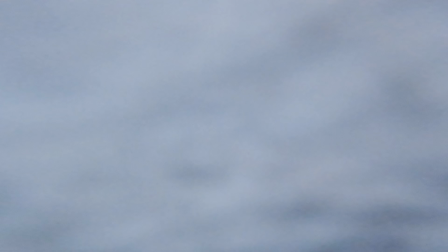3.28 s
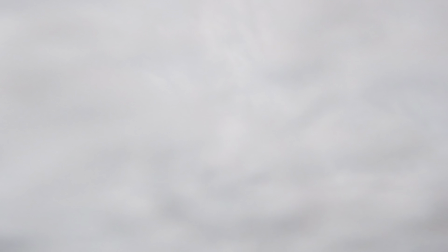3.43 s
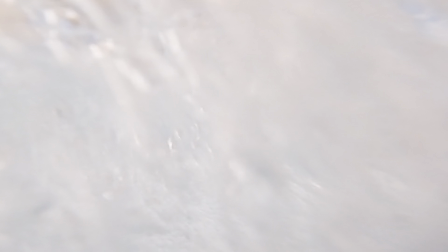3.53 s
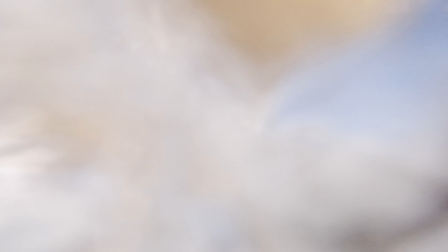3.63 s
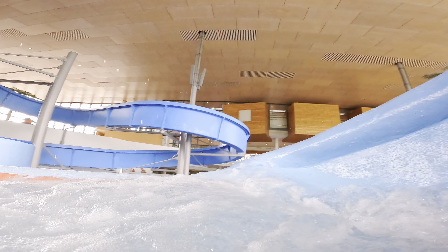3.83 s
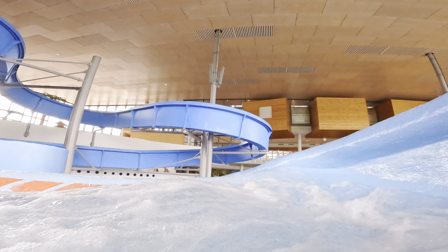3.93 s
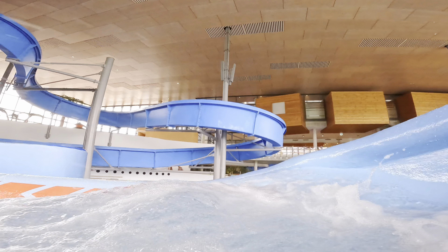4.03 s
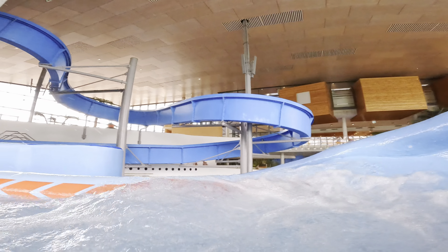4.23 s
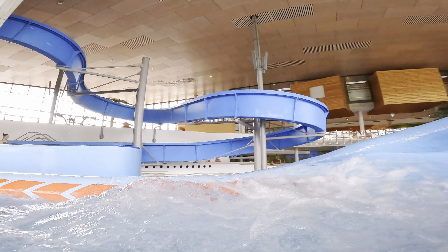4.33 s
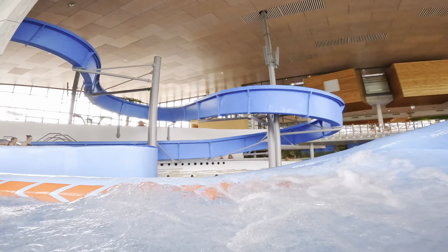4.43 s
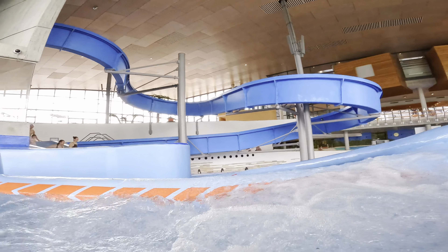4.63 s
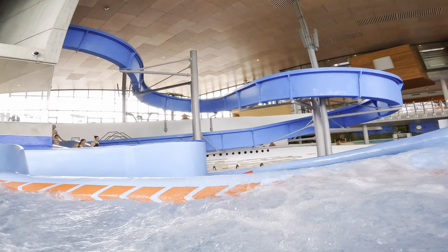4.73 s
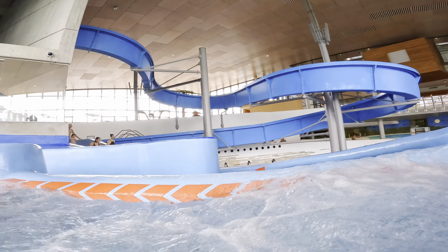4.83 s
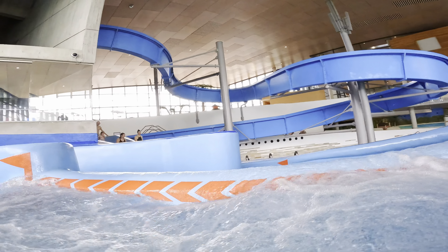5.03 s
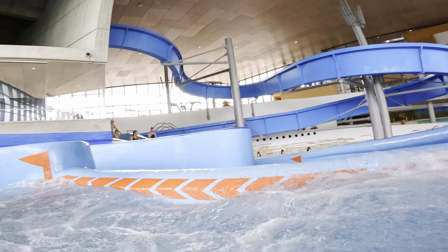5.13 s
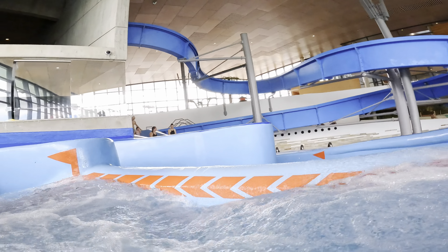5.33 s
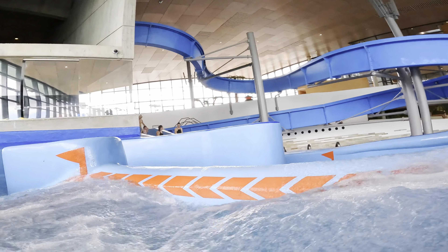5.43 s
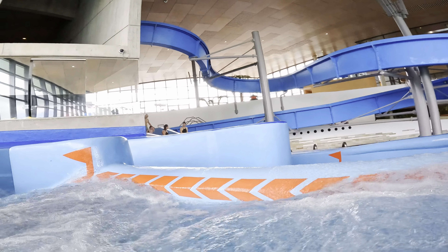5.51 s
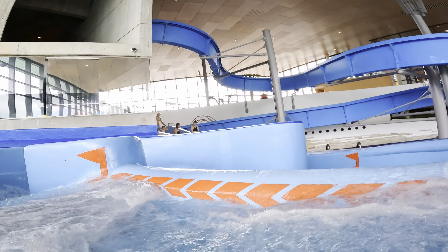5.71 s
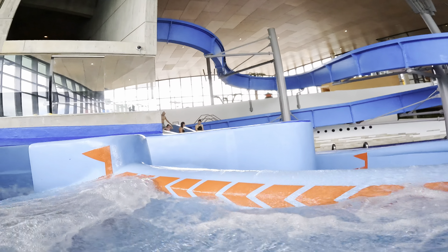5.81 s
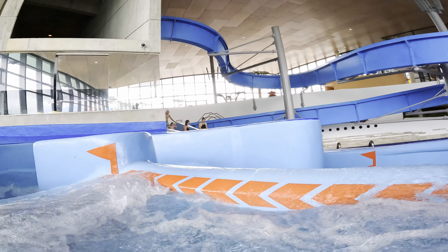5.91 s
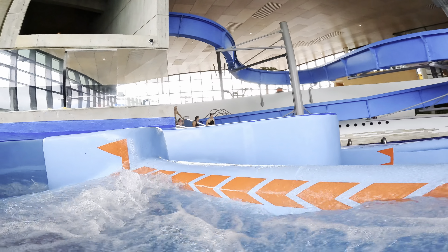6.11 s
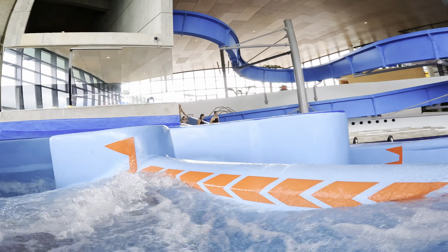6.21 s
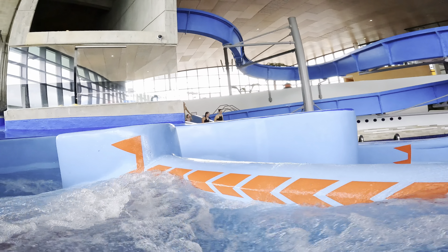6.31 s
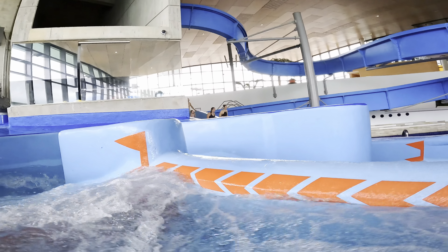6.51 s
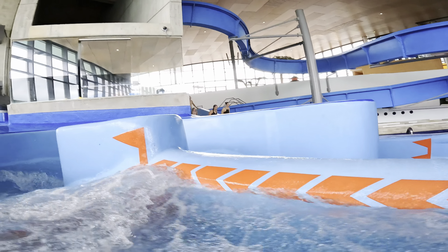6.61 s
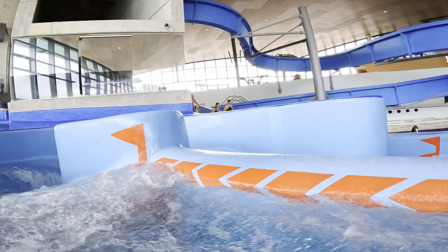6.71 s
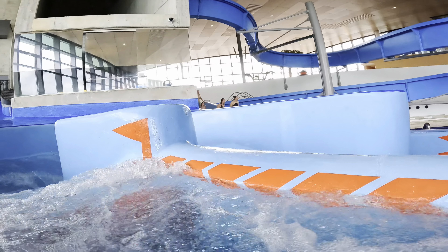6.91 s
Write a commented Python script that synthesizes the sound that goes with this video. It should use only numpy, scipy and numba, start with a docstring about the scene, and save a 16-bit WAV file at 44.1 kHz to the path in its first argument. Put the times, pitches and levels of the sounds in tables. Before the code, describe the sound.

Very close, muffled water: low glugs and fine fizzing bubbles, then a cluster of loud gulps at about one second. Quick gurgling spurts, slaps and bright plinks follow against the housing. The water lets go just before four seconds, leaving a thinner open-air rush that grows fuller and louder in the indoor slide channel, with light wind flutter on the microphone.

```python
"""A ride down a water slide

A waterproof camera rides the rapids of an indoor water slide. It starts submerged in fizzing flow, then churns
along the surface, where water glugs, slaps and bubbles on its housing. At 3.8 s it comes up into the air, and the
rush of the channel grows, heard through a ringing film of water on the ports. Swarms of short ringing tones make
the bubbles, shaped noise makes the rush and spray, and single tones and noise bursts make the closest splashes.
"""
import sys
import numpy as np
from scipy import signal
from scipy.fft import rfft, irfft, next_fast_len
from scipy.io import wavfile
from scipy.ndimage import uniform_filter1d, map_coordinates
from numba import njit

SR = 44100
rng = np.random.default_rng(int(sys.argv[2]) if len(sys.argv) > 2 else 0)


def waveform_to_disk(signal):
    """Save audio, clipped to [-1, 1], as 16-bit WAV at the path in sys.argv[1]."""
    frames = np.transpose(np.atleast_2d(signal))
    scaled = np.clip(frames, -1, 1) * 32767
    samples = np.round(scaled).astype(np.int16)
    wavfile.write(sys.argv[1], SR, samples)


N = 306936  # length in samples

# Loudness over time. Columns: t/s, level/dB
# large air pockets
CHURN_LEVEL = [(0.0, -22), (.3, -21), (.55, -23.5), (.68, -19), (.95, -27.5), (1.09, -18.5), (1.17, -24),
               (1.33, -23), (1.8, -24.5), (2.07, -26.5), (2.21, -18.5), (2.32, -20.5), (2.39, -24.5),
               (2.46, -21.5), (2.6, -21.5), (2.68, -20.5), (2.88, -19.5), (2.96, -24.5), (3.05, -19),
               (3.2, -24.5), (3.27, -19), (3.46, -21.5), (3.64, -21), (3.74, -24), (3.8, -34),
               (3.87, -28.5)]
# tiny bubbles heard under water
FIZZ_LEVEL = [(0.0, -28.5), (.33, -29.5), (.58, -23), (.66, -26.5), (.82, -28.5), (.86, -35.5), (.9, -32),
              (1.0, -29), (1.04, -37.5), (1.06, -72), (1.24, -56), (1.28, -35), (1.33, -59), (1.4, -110)]
# the hollow roar of the housing under water
ROAR_LEVEL = [(0, -27.5), (.4, -25.5), (.62, -25), (.82, -20.5), (.93, -24), (1.04, -21.5)]
# the channel heard in air, as its standing wave nears
RAPIDS_LEVEL = [(3.77, -41.5), (3.93, -36.5), (4.0, -38), (4.13, -31), (4.5, -29), (4.9, -25), (6.0, -21.5),
                (6.96, -19.5)]

# water breaking over the housing
# Columns: start t/s, length/s, bubble level/dB, small bubble level/dB, spray level/dB, bubble pitch f/Hz
WASHES = [(1.085, 0.021, -25, -50, -44.5, 917), (1.115, 0.031, -26.5, -49, -46.5, 907),
          (1.159, 0.071, -19, -29, -28, 1040), (1.299, 0.022, -28.5, -43, -35.5, 1063),
          (1.328, 0.067, -21, -35, -35.5, 1086), (1.403, 0.048, -23, -45, -33, 916),
          (1.457, 0.064, -21.5, -39.5, -32, 1120), (1.526, 0.046, -24.5, -38, -38.5, 1053),
          (1.592, 0.074, -22.5, -38, -31.5, 1263), (1.673, 0.04, -23.5, -37.5, -40.5, 982),
          (1.711, 0.075, -22, -33, -33, 1197), (1.817, 0.018, -25, -44.5, -29, 1254),
          (1.849, 0.034, -22, -40, -33, 1197), (1.889, 0.082, -22.5, -32, -34, 1198),
          (1.982, 0.094, -26.5, -40, -36.0, 1273), (2.708, 0.034, -24.5, -41, -41.5, 1205),
          (2.745, 0.064, -23, -39, -36.5, 1191), (2.818, 0.07, -22.5, -34.5, -35, 1130),
          (2.901, 0.072, -21.5, -38.5, -31.5, 1076), (2.978, 0.036, -23.5, -27.5, -37, 1134),
          (3.02, 0.021, -23, -39, -33, 1050), (3.048, 0.025, -22.5, -31, -30.5, 1220),
          (3.086, 0.016, -23.5, -34, -30.5, 1182), (3.144, 0.013, -23, -38, -35, 970),
          (3.176, 0.022, -24.5, -33, -37.5, 1200), (3.214, 0.026, -24.5, -38, -35.5, 1290),
          (3.268, 0.021, -28.5, -38, -36.5, 1370), (3.305, 0.048, -23, -35, -36.5, 1092),
          (3.364, 0.052, -24, -43, -39, 1186), (3.422, 0.076, -23.5, -41, -34, 1253),
          (3.528, 0.055, -23, -43, -36, 1113), (3.606, 0.034, -23, -39.5, -31.5, 1090),
          (3.652, 0.015, -23.5, -34, -35.5, 1115), (3.714, 0.029, -27.5, -50.5, -52, 1134),
          (3.748, 0.023, -26, -51.0, -55, 942)]
# the draining film of water. Columns: t/s, first mode f/Hz, second mode f/Hz, second mode level/dB
FILM_MODES = [(3.85, 1280, 2990, 12), (4.07, 1252, 2820, 15.5), (4.33, 1210, 2960, 14.5),
              (4.53, 1276, 3130, 20), (4.74, 1262, 3180, 15.5), (5.16, 1278, 3210, 20.5),
              (5.37, 1302, 3330, 16.5), (6.96, 1344, 3380, 19)]
# single bubbles pinching off close by; t60 is the time to fall by 60 dB
# Columns: t/s, level/dB, starting pitch f/Hz, t60/s, pitch gained as a share (below 0: lost)
PLINKS = [(1.2513, -28, 2680, .03, .15), (1.4595, -19.5, 1950, 0.016, -0.051), (1.469, -22, 2890, .03, .15),
          (1.478, -19, 2020, .022, 0.068), (1.5024, -14, 1760, .022, 0.099),
          (1.552, -13.5, 2150, 0.02, 0.07), (1.6527, -16.5, 1840, 0.031, 0.18),
          (1.714, -11, 1890, 0.02, -0.32), (1.767, -18, 2150, 0.017, .15), (1.8046, -24, 2230, 0.026, 0.41),
          (1.891, -18.5, 1810, 0.026, 0.21), (1.9278, -15.5, 1930, .022, .1),
          (1.941, -26, 1810, 0.027, -0.057), (1.9979, -14, 2300, 0.018, 0.2),
          (2.016, -20, 2720, 0.017, 0.35), (2.057, -14, 2550, 0.022, 0.37),
          (2.2358, -22.5, 2200, .015, 0.16), (2.2837, -14.5, 2350, 0.036, .02),
          (2.297, -27, 2050, 0.016, 0.27), (2.316, -36.5, 3500, .02, .05), (2.349, -30.5, 3830, .02, -0.11),
          (2.356, -17, 1950, .012, .1), (2.3599, -13, 2410, 0.016, 0.12),
          (2.417, -12.5, 2520, 0.0082, 0.47), (2.44, -26.5, 3170, .012, 0.11),
          (2.474, -35, 3550, .018, -0.023), (2.505, -37.5, 4400, 0.013, .05), (2.5204, -27, 2370, .02, .1),
          (2.566, -30.5, 1820, 0.02, .12), (2.604, -32, 3380, 0.023, .05),
          (2.7363, -23.5, 2330, 0.038, .05), (3.8278, -26, 3200, 0.022, -0.089),
          (4.206, -30.5, 2900, 0.019, 0.1), (5.481, -41, 2950, .012, -0.023)]
# sheets and drops of water slapping the housing. Columns: t/s, level/dB, ring f/Hz, t60/s
SLAPS = [(1.161, -28, 1025, 0.053), (1.203, -20.5, 1060, 0.066), (1.301, -26, 840, 0.022),
         (1.594, -17, 1196, 0.016), (1.82, -20, 1470, 0.037), (1.851, -25, 1290, 0.025),
         (2.1417, -24, 1325, 0.047), (2.296, -19.5, 1300, 0.021), (2.3396, -30, 1320, .025),
         (2.395, -17, 1300, 0.029), (2.4827, -21.5, 1450, 0.03), (2.532, -17, 1430, 0.02),
         (2.5637, -17.5, 1460, 0.019), (2.605, -34, 1340, 0.017), (2.71, -19.5, 1420, .025),
         (2.748, -22, 1380, 0.051), (2.902, -23, 1300, 0.019), (3.146, -20.5, 996, 0.043),
         (3.178, -23, 895, 0.019), (3.19, -20, 1420, 0.019), (3.2692, -23.5, 1446, .035),
         (3.606, -21.5, 1125, 0.047), (3.661, -24, 1060, 0.042), (3.76, -22, 877, 0.06),
         (3.827, -28, 1360, 0.017), (3.872, -27.5, 1264, 0.032), (4.137, -21, 1210, 0.019),
         (4.2062, -23.5, 1290, 0.04)]
# big gulps of air. Columns: t/s, level/dB, pitch f/Hz, t60/s
GULPS = [(0.205, -14, 432, 0.045), (.592, -9.5, 440, 0.032), (0.632, -4.5, 285, 0.045),
         (.755, -11.5, 414, 0.023), (.841, -8.5, 358, 0.037), (1.023, -5.5, 440, 0.021),
         (1.039, 1, 390, 0.034), (1.063, -4, 430, 0.043), (1.093, -2, 450, 0.041),
         (1.109, -11.5, 684, 0.043), (1.132, -3, 412, .042), (1.262, -12, 601, 0.035), (1.3, -8, 266, .04),
         (2.61, 2, 313, 0.018), (3.119, -10, 503, 0.063)]
# soft thuds as the water lets go of the housing. Columns: t/s, level/dB, swell time/s
THUDS = [(3.841, -16.5, .007), (3.9678, -14, .004), (4.212, -22, 0.0054)]
# big eddies of water or air that lean on the ports, or lulls between them
# Columns: middle t/s, half length/s, extra level/dB
SURGES = [(.15, 0.17, -2.5), (0.67, .07, -8.5), (0.825, 0.055, 1), (1.081, 0.047, 5), (1.326, 0.07, 7.5),
          (1.81, .05, -4.5), (1.92, 0.056, 6), (2.397, 0.019, 3.5), (3.446, 0.016, 7), (3.781, .025, -4),
          (4.158, .09, 6), (4.428, 0.04, 8.5), (5.4, 0.056, 6)]

# Tone colour: how strong each frequency is. Columns: f/Hz, level/dB
# eddies pushing on the ports, in water or air
BUFFET_COLOUR = [(6, -14.5), (18, 4), (35, 3), (70, -1), (115, -4), (200, -16.5), (500, -56), (1200, -105),
                 (4000, -150)]
# large air pockets and the dull roar under them
CHURN_COLOUR = [(70, -17), (130, 0.5), (200, -3), (320, -6), (480, -3.5), (620, -13.5), (900, -19.5),
                (1800, -44), (4000, -82), (8000, -140)]
# the hollow housing under water
ROAR_COLOUR = [(120, -34), (250, -9.5), (330, -2.5), (480, -1), (560, -13.5), (700, -28), (1500, -78.5)]
# clouds of tiny bubbles
FIZZ_COLOUR = [(400, -18), (700, 2), (1300, -3.5), (2000, -9.5), (2800, -10.5), (3350, -5), (3520, -23.5),
               (4200, -15), (4500, -24.5), (6100, -23.5), (6500, -28), (8000, -30), (12000, -41.5),
               (15500, -61)]
# water drops and spit
SPRAY_COLOUR = [(600, -1.5), (1300, -4), (2000, -9.5), (2800, -7.5), (4000, -14.5), (5500, -26),
                (7500, -35.5), (10000, -57.5), (15000, -88.5)]
# the rush of the channel
RAPIDS_COLOUR = [(50, -2.5), (100, -5), (155, 9), (200, 4.5), (290, -1), (400, -1), (510, 3), (680, -3.5),
                 (1100, -4.5), (1700, -14.5), (1990, -12), (2070, -15), (2170, -29.5), (2300, -20.5),
                 (2500, -38), (2690, -48), (2850, -35.5), (3020, -43), (3300, -37.5), (4000, -41.5),
                 (4300, -40), (5000, -42), (6200, -55.5), (12000, -81)]

# modes of the trapped air pocket. Columns: f/Hz, width/Hz, level/dB
POCKET_MODES = [(1300, 190, 28.5), (2500, 180, 13.5), (3400, 500, -26)]
# how far the left port leads the right. Columns: f/Hz, phase/rad
PORT_LEAD = [(200, 0), (400, .9), (500, 1.8), (590, 3.5), (750, 4.4), (1000, 4.68), (1500, 4.71)]
# the left port against the right, in water. Columns: f/Hz, level/dB
PORTS_AWASH = [(60, -2), (150, -2.5), (250, -5), (400, -5.5), (580, -14), (920, -3), (1400, 0), (2300, 3),
               (3500, 6), (4500, 16), (6000, 41)]
# the left port against the right, in air. Columns: f/Hz, level/dB
PORTS_IN_AIR = [(60, 11), (150, -1), (300, 1.5), (400, 1), (580, -16), (920, -3.5), (1400, 1), (2300, 3),
                (3500, 6.5), (6000, 32)]

TOP_HZ = 15600  # nothing is kept above this
DIVE_END_S, SURFACE_S = 1.044, 3.85  # the camera leaves the depths; it clears the water
BUFFET_DB, BUFFET_SWAY_DB = -20.5, 2.7  # steady push of the flow on the housing, and its random sway
WIND_DB, WIND_FOLLOWS = -27, 0.59  # air on the ports beside the standing wave; dB lost per dB of quieter rush
FIZZ_BODY_DB = -28.5  # the low part of the fizz, whose level is held under water
WASH_ATTACK_S, WASH_T60_S = 0.0022, 0.042  # each wash strikes at once, holds, then runs off
WASH_RISE = 0.11  # pitch gained from start to end of a wash, as a share of its middle pitch
WASH_RING, WASH_DAMPING = 0.75, 0.096  # ring of the folded air against the bubbles; its width over its pitch
FROTH_DB, MIST_DB = -37, -48.5  # bubbles left between the washes; small bubbles and spray left there
TRAPPED_S = (2.08, 2.71)  # air sits at the ports: (from s, to s)
GURGLE_DB, SPIT_DB = -29, -51  # its bursting bubbles; its small plinks and spit, both halfway through
GURGLE_EBB_DB, SPIT_EBB_DB = 6.5, 22  # how much weaker both are as the pocket forms and as it leaves
SNAP_DB, SNAP_S = -27, .0007  # the click of a bubble's neck closing: against its ring, and its life
TWIN_DB, TWIN_RATIO, TWIN_LAG_S = -12, 1.327, 0.0025  # a smaller twin bubble: strength, base pitch ratio, delay
CRACK_DB, CRACK_S = -6, 0.0011  # the first contact of a slap: its strength and its life
THUD_HZ, THUD_FALL, THUD_SLOSH = 580, 1.25, .35  # starting pitch; sinking time in swells; noise against tone
FILM_WIDTH_HZ, FILM_FRESH_HZ = 83, 4.9  # second mode's width at the loudest rush; added per dB of quieter rush
FILM_FLUTTER_DB = 2.2  # the second mode flutters in strength


def amp(db):
    """Turn decibels into a gain."""
    return 10 ** (np.asarray(db) / 20)


def unit(x):
    """Scale to an average (rms) strength of 1."""
    return x / np.sqrt(np.mean(x ** 2) + 1e-20)


def along(points, hz):
    """Read a curve of (f/Hz, value) points along a log frequency axis."""
    f, v = np.transpose(points)
    return np.interp(np.log(hz + 1), np.log(f + 1), v)


def curves(rows):
    """Draw one curve, with a value per sample, for each column after the time."""
    s, *cols = np.transpose(rows)
    return [np.interp(np.arange(N) / SR, s, c) for c in cols]


def during(start, end, fade=0.012):
    """Give 1 from start to end, fading to 0 outside."""
    t = np.arange(N) / SR
    return np.clip(1 + np.minimum(t - start, end - t) / fade, 0, 1)


def wobble(rate):
    """Draw a smooth random curve with this many random points a second."""
    return map_coordinates(rng.standard_normal(int(N * rate / SR) + 4), [np.arange(N) * rate / SR])


def steady(x, span=0.068):
    """Even out the strength over each span (s), so that only the fast texture is left."""
    power = uniform_filter1d(uniform_filter1d(x ** 2, int(span * SR), axis=-1), size=200, axis=-1)
    return x / np.sqrt(np.abs(power) + 1e-12)


def filtered(x, response):
    """Multiply each frequency of x by a response, which may also shift its phase."""
    m = next_fast_len(N + SR // 2)
    return irfft(rfft(x, m) * response(np.fft.rfftfreq(m, 1 / SR)), m)[..., :N]


def lowpass(x, cutoff_hz, order):
    """Weaken what lies above the cutoff, without shifting its phase."""
    return filtered(x, lambda hz: 1 / (1 + (hz / cutoff_hz) ** order))


def coloured(x, spectrum):
    """Give x a tone colour, at rms 1."""
    return unit(filtered(x, lambda hz: amp(along(spectrum, hz))))


def band_burst(order, low_hz, high_hz, length):
    """Make noise between two frequencies, at rms 1."""
    band = signal.butter(order, [low_hz, high_hz], "band", fs=SR)
    return unit(signal.lfilter(*band, rng.standard_normal(length)))


def pair(source, apart):
    """Make two channels that share a source, each with a part (0-1) of its own."""
    apart = np.clip(apart, 0, 1)
    return np.sqrt(1 - apart) * source() + np.sqrt(apart) * np.array([source(), source()])


def add(track, s, sound):
    """Mix a sound into a track at time s."""
    part = track[max(round(s * SR), 0):][:len(sound)]
    part += sound[:len(part)]


def crackle(rate, spread_db, hiss):
    """Mix white noise with random clicks of uneven size, rate clicks a second."""
    noise = rng.standard_normal(N)
    at, size, sign = rng.random((int(rate * N / SR), 3)).T
    heights = np.sign(sign - .5) * amp(spread_db * size)
    clicks = np.bincount((at * N).astype(int), heights, N)
    return unit(unit(clicks) + hiss * noise)


def spurts(rate, life, spread_db, base):
    """Make a gain that jumps at random moments and dies away over its life (s)."""
    at, size = rng.random((int(rate * N / SR), 2)).T
    jumps = np.bincount((at * N).astype(int), amp(spread_db * size), N)
    return base + unit(signal.lfilter([1], [1, -np.exp(-1 / (life * SR))], jumps))


def bubbles(rate, pitch_hz, scatter, cycles, rise, spread_db, size=1200):
    """Make a swarm of bubbles: each swells, rings a few cycles and rises in pitch."""
    at, strength, phase, a, b = rng.random((int(rate * N / SR), 5)).T[:, :, None]
    start = (at * N).astype(int)
    hz = np.broadcast_to(pitch_hz, N)[start] * np.exp(scatter * (a - b))
    k = np.arange(size)
    turns = hz * k / SR
    age = turns / cycles
    swell = (1 - np.exp(-2 * turns)) * np.exp(-age) * (1 - k / size)
    rising_turns = turns * (1 + rise * age / (1 + age))
    ring = amp(spread_db * strength) * swell * np.sin(2 * np.pi * (phase + rising_turns))
    return unit(np.bincount((start + k).ravel(), ring.ravel(), N + size)[:N])


def small_bubbles(pitch_hz):
    """Make clear, rising plinks: small bubbles ring high."""
    swarm = bubbles(rate=290, pitch_hz=pitch_hz, scatter=.52, cycles=14.0, rise=0.12, spread_db=14, size=1100)
    return lowpass(swarm, 4200, order=6)


@njit
def resonate(x, step, damping):
    """Ring like a hollow whose pitch (radians a sample) and width over pitch can move."""
    out = np.zeros(len(x))
    low = band = 0.0
    for i in range(len(x)):
        low += step[i] * band
        band += step[i] * (x[i] - low - damping[i] * band)
        out[i] = damping[i] * band
    return out


def surge_db():
    """Each big eddy swells and passes as a smooth bump in level; a lull is a dip."""
    t = np.arange(N) / SR
    return sum(db * np.exp(-((t - s) / half) ** 2) for s, half, db in SURGES)


def buffet():
    """Eddies push on the housing as deep noise, a little differently at each port."""
    level_db = BUFFET_DB + surge_db() + BUFFET_SWAY_DB * wobble(6.5)
    eddies = pair(lambda: coloured(rng.standard_normal(N), BUFFET_COLOUR), apart=0.21)
    return amp(level_db) * during(0, SURFACE_S, fade=0.018) * steady(eddies, span=0.24)


def churn():
    """Large air pockets glug at low pitches over a dull roar of noise."""
    level_db, = curves(CHURN_LEVEL)

    def glugs():
        """Pockets ring low in the noise of the flow."""
        pockets = bubbles(rate=130, pitch_hz=292.0, scatter=0.96, cycles=11.0, rise=0.22, spread_db=5.0, size=2200)
        dull_roar = coloured(rng.standard_normal(N), CHURN_COLOUR)
        return coloured(pockets, CHURN_COLOUR) + 1.34 * dull_roar

    level = amp(level_db + 1.7 * wobble(27.8)) * during(0, SURFACE_S)
    return level * steady(pair(glugs, apart=0.26), span=.06)


def roar():
    """The submerged housing booms in the flow, in irregular surges."""
    level_db, = curves(ROAR_LEVEL)
    boom = pair(lambda: coloured(rng.standard_normal(N), ROAR_COLOUR), apart=0.11)
    return amp(level_db + 0.71 * wobble(22)) * during(0, DIVE_END_S, fade=.04) * steady(boom)


def fizz():
    """Under water, clouds of tiny bubbles hiss and tick, and thin out as the camera rises."""
    level_db, = curves(FIZZ_LEVEL)
    ticks = bubbles(rate=500, pitch_hz=2108, scatter=0.94, cycles=26, rise=0.08, spread_db=36.0, size=700)
    cloud = coloured(crackle(rate=2900, spread_db=21.5, hiss=1.2) + 0.17 * ticks, FIZZ_COLOUR)
    body = lowpass(cloud, 1300, order=4)
    low_part = amp(FIZZ_BODY_DB) * during(0, DIVE_END_S, fade=0.015) * body
    high_part = amp(level_db) * (cloud - body)
    return amp(1.6 * wobble(30)) * (low_part + high_part)


def dulled(x):
    """The wet ports soften the highest part of the closest single sounds."""
    return lowpass(x, 6500, order=6)


def gulps():
    """A big gulp of air rings low as water thumps shut behind it."""
    out, t = np.zeros(N), np.arange(SR // 6) / SR
    for s, db, hz, t60 in GULPS:
        ring = amp(-60 * t / t60) * (1 - np.exp(-t / 0.0015)) ** 2 * np.sin(2 * np.pi * hz * t)
        u = t / 0.0013
        push = u * (1 - u / 2) * np.exp(-u) * (1 - np.exp(-2 * u)) ** 2  # the thump of the water
        add(out, s, amp(db) * (ring + 1.6 * push))
    return dulled(out)


def wash_motion():
    """Each wash strikes, holds and runs off while its bubbles shrink and so rise in pitch."""
    t = np.arange(N) / SR
    awash = during(DIVE_END_S, WASHES[-1][0] + WASHES[-1][1]) * (1 - during(*TRAPPED_S))
    gains = amp([[FROTH_DB], [MIST_DB], [MIST_DB]]) * awash  # rows: bubbles, small bubbles, spray
    pitch_hz = np.full(N, float(WASHES[0][5]))
    for s, length, bubbles_db, small_db, spray_db, hz in WASHES:
        near = slice(int(s * SR), int((s + length + WASH_T60_S) * SR))
        age = t[near] - s
        run_off = amp(-60 * np.maximum(age - length, 0) / WASH_T60_S)
        shape = np.clip(age / WASH_ATTACK_S, 0, 1) * run_off
        levels = amp([[bubbles_db], [small_db], [spray_db]])
        gains[:, near] = np.maximum(gains[:, near], levels * shape)
        pitch_hz[near.start:] = hz
        pitch_hz[near] = hz * (1 + WASH_RISE * (np.clip(age / length, 0, 1) - .5))
    return gains, pitch_hz


def washes():
    """Water breaks over the housing in spurts of bubbles, plinks and spray; thin froth lingers between."""
    gains, pitch_hz = wash_motion()
    pulse = spurts(rate=95, life=0.006, spread_db=12, base=0.45)
    swarm = bubbles(rate=600, pitch_hz=pitch_hz, scatter=0.45, cycles=11.1, rise=0.12, spread_db=12.5, size=1400)
    swarm = lowpass(swarm * np.sqrt(pulse), 2600, order=4)
    impacts = pulse * crackle(rate=1800, spread_db=20.5, hiss=0.88)
    # air folded under the wash rings with each spurt
    step = 2 * np.pi * pitch_hz / SR
    ring = resonate(coloured(impacts, SPRAY_COLOUR), step, np.full(N, WASH_DAMPING))
    swarm = unit(swarm) + WASH_RING * unit(ring)
    spray = coloured(impacts + 0.32 * pulse * rng.standard_normal((2, N)), SPRAY_COLOUR)
    plinking = small_bubbles(pitch_hz=1989)
    out = gains[0] * steady(swarm, span=0.016)
    out = out + gains[1] * steady(plinking, span=0.12)
    return out + gains[2] * steady(spray, span=0.014)


def slaps():
    """Water slaps the housing: a crack on contact, then a noisy sheet and a rising ring of folded-in air."""
    out, t = np.zeros(N), np.arange(SR // 6) / SR
    for s, db, hz, t60 in SLAPS:
        sheet = band_burst(3, 0.62 * hz, 1.1 * hz, len(t))
        cavity = np.sin(2 * np.pi * hz * t * (1 + 0.98 * t))  # the air that the slap folds in
        crack = amp(CRACK_DB) * np.exp(-t / CRACK_S) * band_burst(4, 900, 2100, len(t))
        ring = amp(-60 * t / t60) * (1 - np.exp(-t / 0.00085)) * (sheet + 2.47 * cavity)
        add(out, s, amp(db) * (ring + crack))
    return dulled(out)


def plinks():
    """A bubble pinches off with a click and a gliding ring, and sheds a smaller twin."""
    out, t = np.zeros(N), np.arange(SR // 6) / SR
    for s, db, hz, t60, rise in PLINKS:
        turns = np.cumsum(hz * (1 + rise * (1 - np.exp(-3 * t / t60)))) / SR
        decay = amp(-60 * t / t60)
        ring = decay * (1 - np.exp(-t / 0.00039)) * np.sin(2 * np.pi * turns)
        snap = amp(SNAP_DB) * np.exp(-t / SNAP_S) * rng.standard_normal(len(t))
        add(out, s, amp(db) * (ring + snap))
        ratio = TWIN_RATIO ** rng.uniform(0.6, 1.5)  # each twin has its own size
        twin = decay ** 2 * (1 - np.exp(-turns)) * np.sin(2 * np.pi * turns * ratio)
        add(out, s + TWIN_LAG_S, amp(db + TWIN_DB) * twin)
    return dulled(out)


def pocket_response(f):
    """Trapped air rings at its modes and blocks the band between the first two."""
    modes = 0
    for k, (centre, width, db) in enumerate(POCKET_MODES):
        mode = 1j * f * width / (centre * centre - f * f + 1j * f * width)
        modes = modes + (-1) ** k * amp(db) * mode
    hollow = 1 - 0.7 * np.exp(-((f - 2150) / 270) ** 2)
    return modes * hollow / (1 + (f / 3600) ** 8)


def trapped_air():
    """A pocket of air covers the ports; bursting bubbles ring its modes, small ones plink and spit."""
    pulse = spurts(rate=71, life=0.0079, spread_db=12, base=0.21)
    bursts = crackle(rate=850, spread_db=17, hiss=0.68) * pulse
    gurgle = unit(filtered(bursts, pocket_response))
    blips = bubbles(rate=120, pitch_hz=1373, scatter=0.13, cycles=16.0, rise=0.071, spread_db=12.0, size=1600)
    blips = lowpass(blips, 3000, order=4)

    def spit_response(f):
        """Spray with its low part thinned out."""
        return amp(along(SPRAY_COLOUR, f)) * f ** 4 / (f ** 4 + 2600 ** 4)

    spit = unit(filtered(unit(bursts * pulse) + 0.53 * rng.standard_normal(N), spit_response))
    small = steady(small_bubbles(pitch_hz=2660) + 0.8 * spit, span=0.057)
    ebb = np.interp(np.arange(N) / SR, TRAPPED_S, [-1, 1]) ** 2  # 1 at both ends, 0 halfway
    gurgle = amp(GURGLE_DB - GURGLE_EBB_DB * ebb) * steady(gurgle + 0.51 * blips, span=0.03)
    small = amp(SPIT_DB - SPIT_EBB_DB * ebb) * small
    return during(*TRAPPED_S) * (gurgle + small)


def rapids():
    """The channel's rush passes a draining film of water, which rings at two wandering, rising modes."""
    level_db, = curves(RAPIDS_LEVEL)
    first_hz, second_hz, second_db = curves(FILM_MODES)
    far_db = level_db.max() - level_db  # how far the rush is below its loudest
    rush = coloured(crackle(rate=900, spread_db=23.0, hiss=1.55), RAPIDS_COLOUR)
    bass = lowpass(rush, 380, order=4)
    rush = rush - bass + bass * amp(-.21 * far_db)  # the nearer the standing wave, the fuller its roar
    rush = rush + 7.8 * resonate(rush, 2 * np.pi * first_hz / SR, np.full(N, 0.091))
    width_hz = FILM_WIDTH_HZ + FILM_FRESH_HZ * far_db  # wider while the film is thick
    hiss = resonate(rush, 2 * np.pi * second_hz / SR, width_hz / second_hz)
    rush = rush + amp(second_db + FILM_FLUTTER_DB * wobble(24)) * hiss
    level = amp(level_db + (0.51 + 0.03 * far_db) * wobble(16))
    return level * during(RAPIDS_LEVEL[0][0], N / SR) * steady(rush, span=0.15)


def thuds():
    """Water peels off the housing: a short, sloshing push whose pitch sinks at once."""
    out, t = np.zeros(N), np.arange(SR // 10) / SR
    for s, db, swell in THUDS:
        turns = np.cumsum(THUD_HZ * np.exp(-t / (THUD_FALL * swell))) / SR
        slosh = band_burst(4, 60, 560, len(t))
        shape = (t / swell * np.exp(1 - t / swell)) ** 2
        add(out, s, amp(db) * shape * (np.sin(2 * np.pi * turns) + THUD_SLOSH * slosh))
    return out


def wind():
    """Moving air flutters on each port, partly on its own, and harder near the standing wave."""
    rush_db, = curves(RAPIDS_LEVEL)
    level_db = WIND_DB + WIND_FOLLOWS * (rush_db - rush_db.max()) + surge_db() + 1.2 * wobble(21)
    flutter = pair(lambda: coloured(rng.standard_normal(N), BUFFET_COLOUR), apart=0.6)
    return amp(level_db) * during(SURFACE_S, N / SR) * steady(flutter, span=0.26)


def ports(x, balance):
    """The two wet ports pass the same pressure with different level and phase."""
    def response(hz):
        """Left and right gains whose sum keeps its strength."""
        ratio = amp(along(balance, hz)) * np.exp(1j * along(PORT_LEAD, hz))
        return 2 * np.array([ratio, np.ones_like(ratio)]) / np.abs(1 + ratio)

    return filtered(x, response)


def scene():
    """Water on the housing and sound from the air both pass the ports."""
    water = buffet() + churn() + roar() + fizz()
    water = water + gulps() + washes() + slaps() + plinks() + trapped_air() + thuds()
    air = rapids() + wind()
    return ports(water, PORTS_AWASH) + ports(air, PORTS_IN_AIR)


def record(dry):
    """The camera rounds off the highest peaks and keeps nothing above its band limit."""
    held = dry / (1 + np.abs(dry / .98) ** 10) ** (1 / 10)
    return filtered(held, lambda hz: hz < TOP_HZ)


dry = scene()
out = record(dry)
waveform_to_disk(out)
```